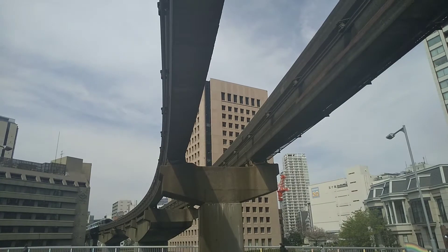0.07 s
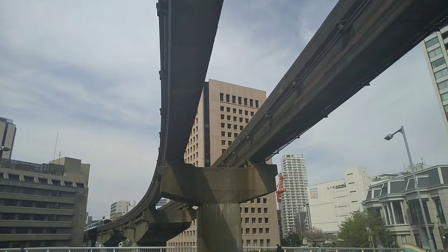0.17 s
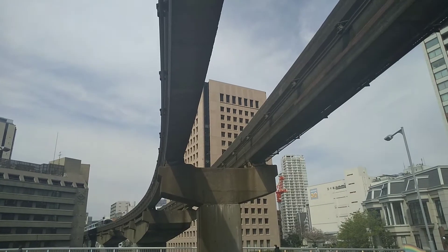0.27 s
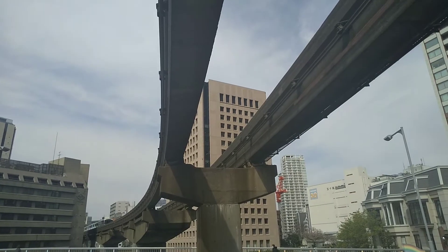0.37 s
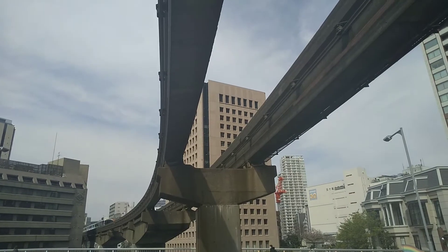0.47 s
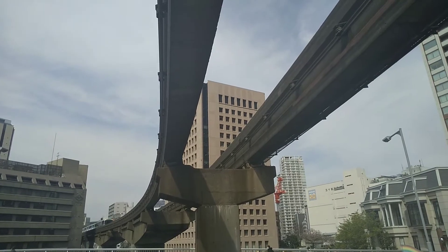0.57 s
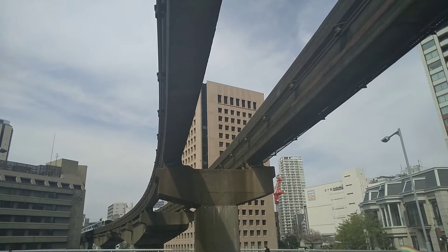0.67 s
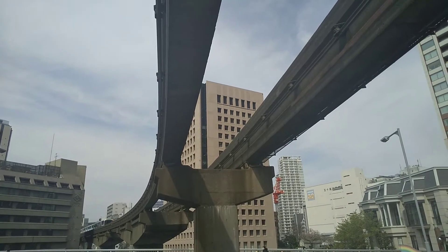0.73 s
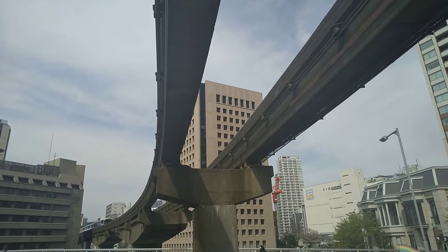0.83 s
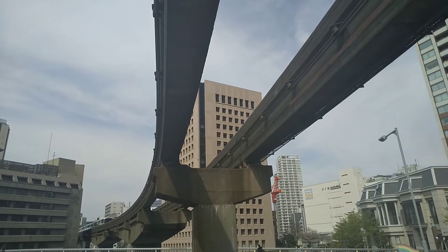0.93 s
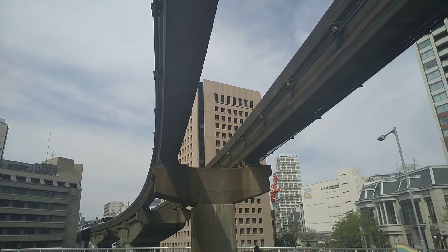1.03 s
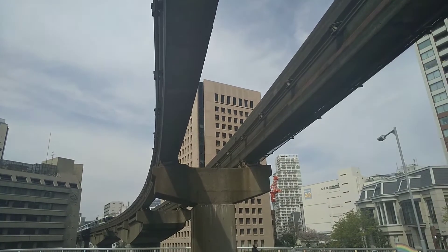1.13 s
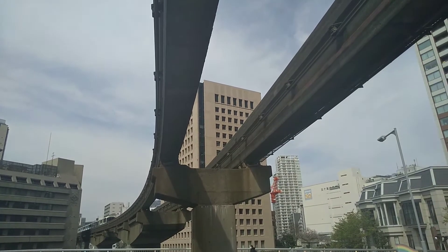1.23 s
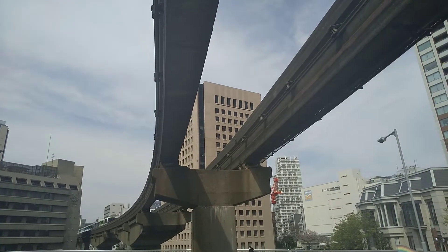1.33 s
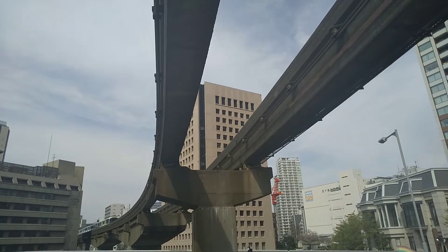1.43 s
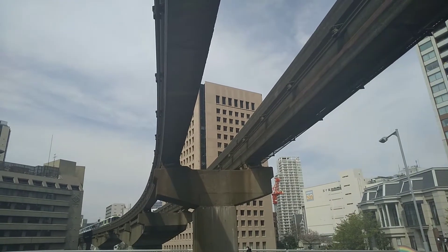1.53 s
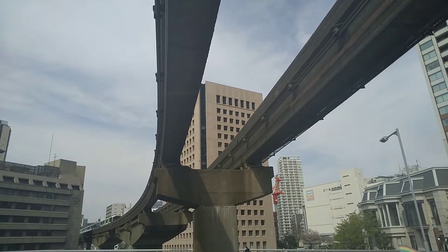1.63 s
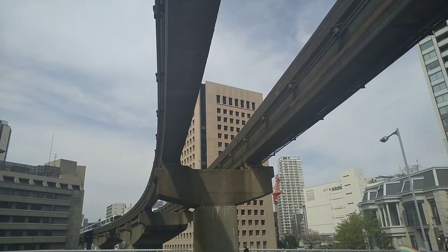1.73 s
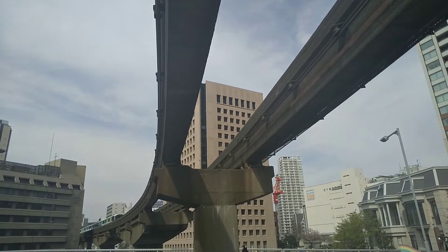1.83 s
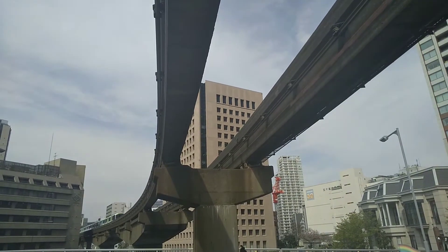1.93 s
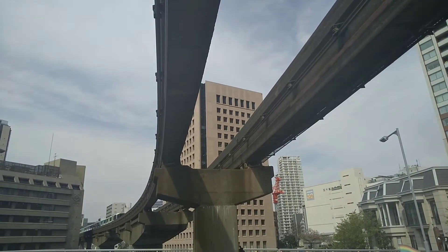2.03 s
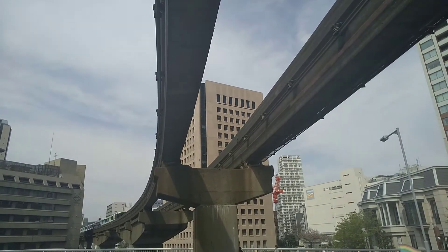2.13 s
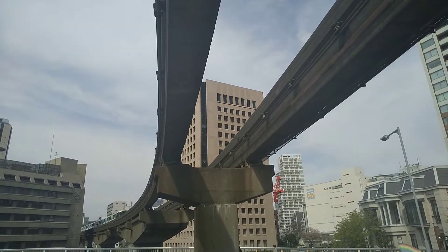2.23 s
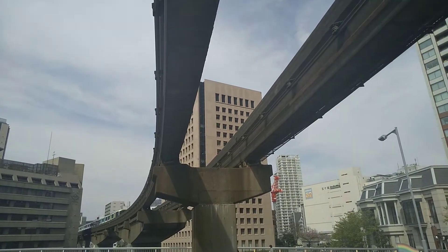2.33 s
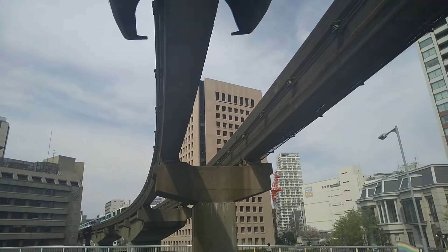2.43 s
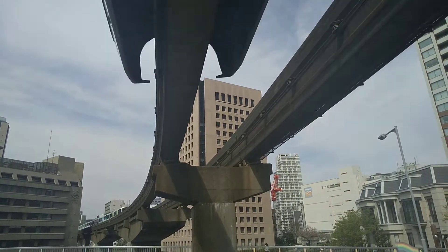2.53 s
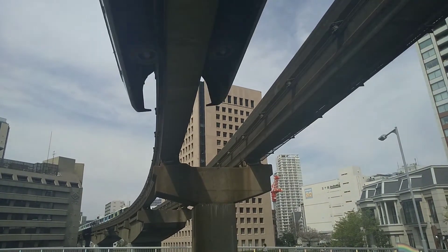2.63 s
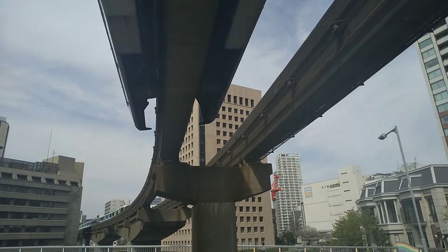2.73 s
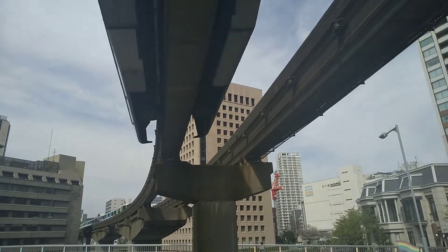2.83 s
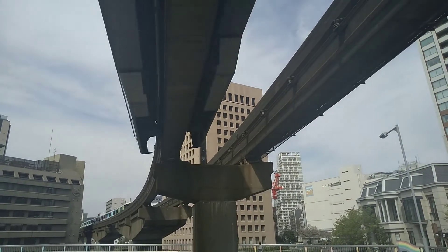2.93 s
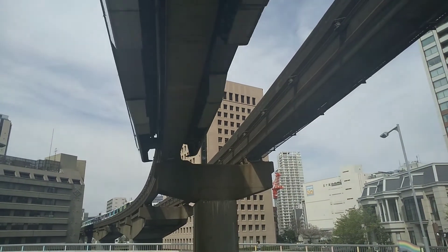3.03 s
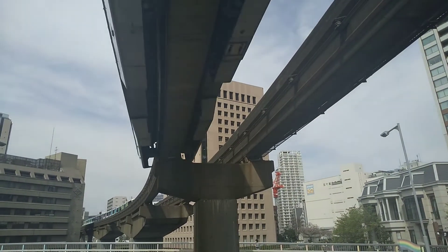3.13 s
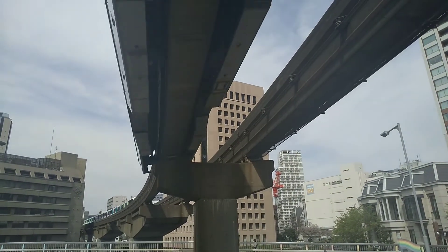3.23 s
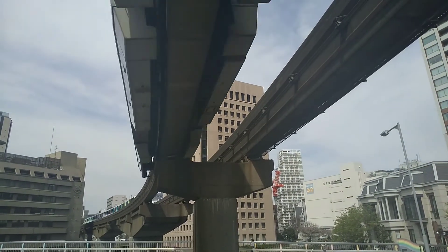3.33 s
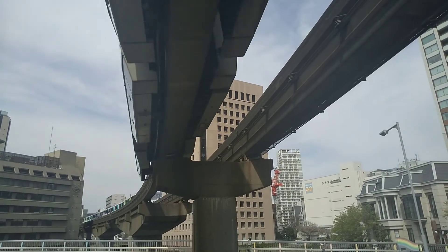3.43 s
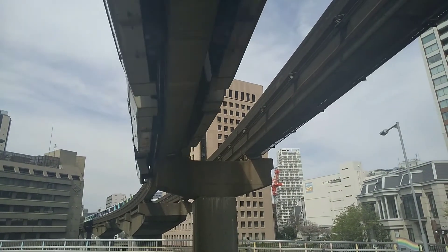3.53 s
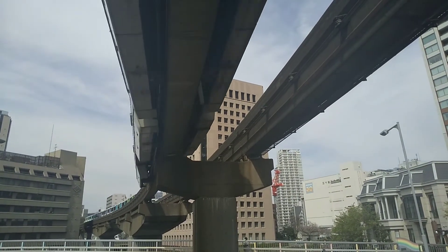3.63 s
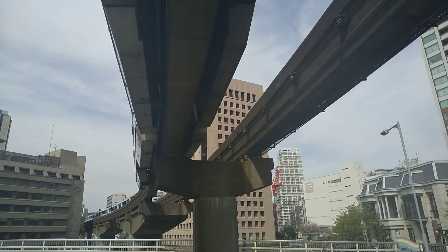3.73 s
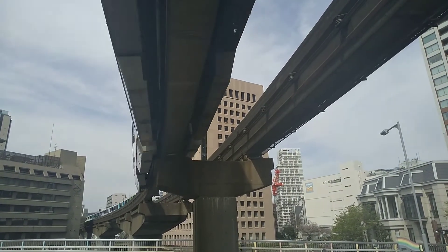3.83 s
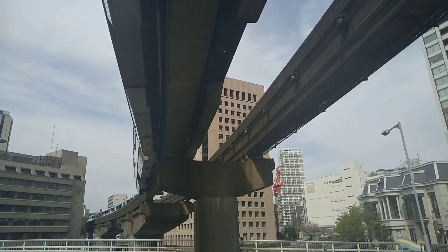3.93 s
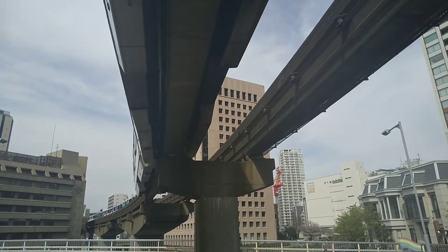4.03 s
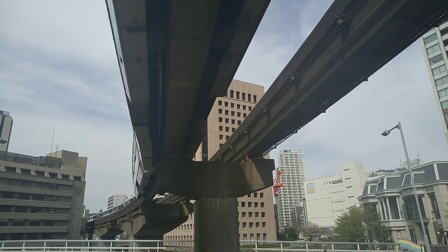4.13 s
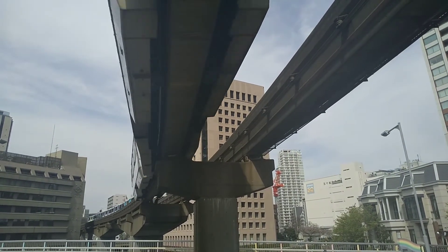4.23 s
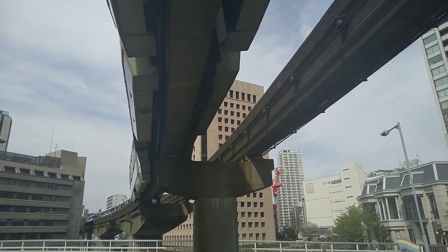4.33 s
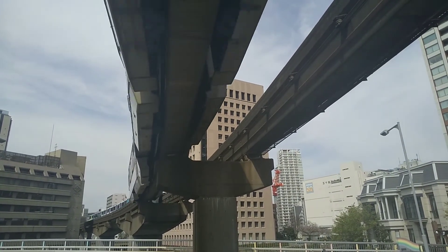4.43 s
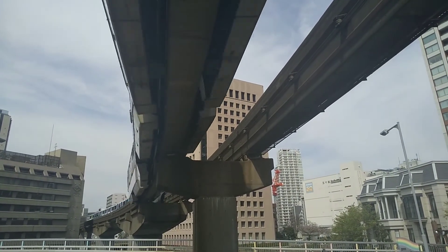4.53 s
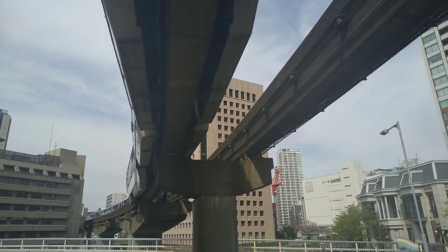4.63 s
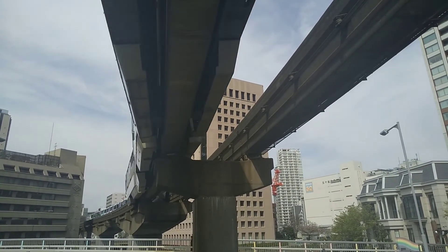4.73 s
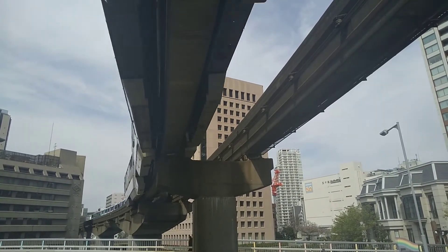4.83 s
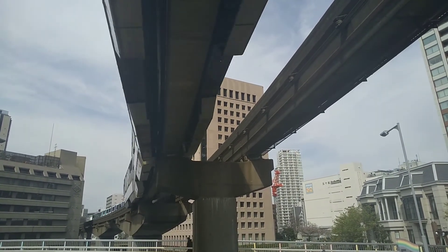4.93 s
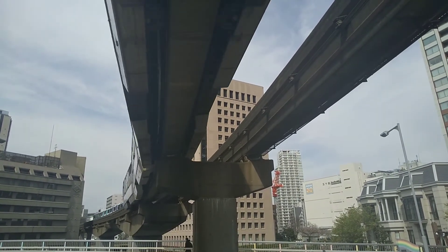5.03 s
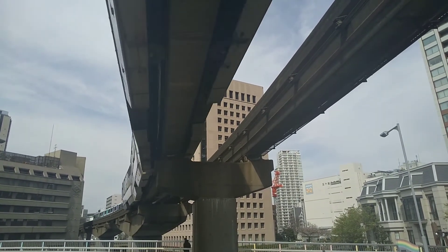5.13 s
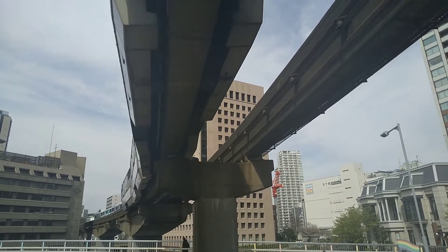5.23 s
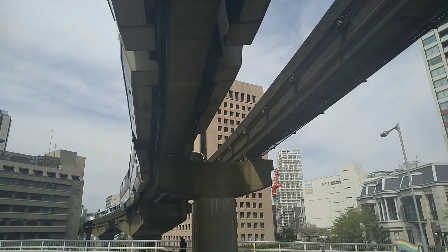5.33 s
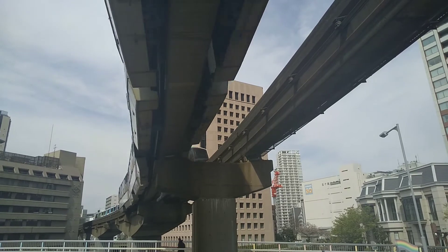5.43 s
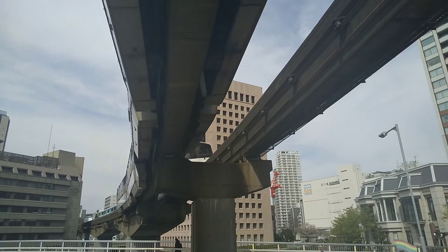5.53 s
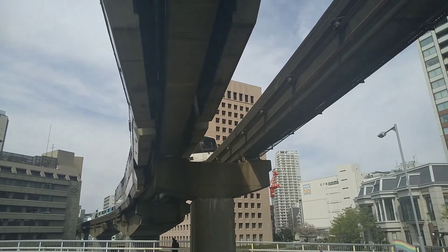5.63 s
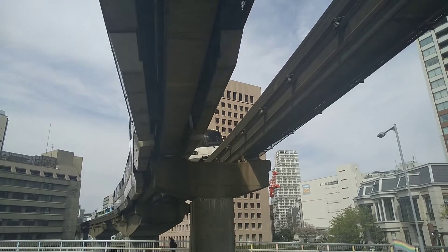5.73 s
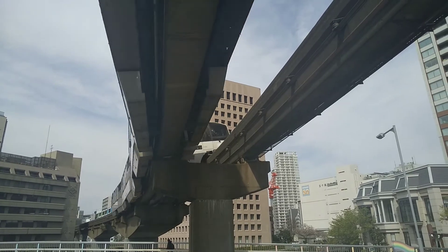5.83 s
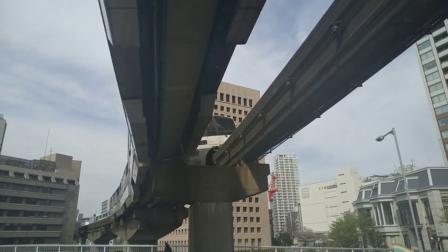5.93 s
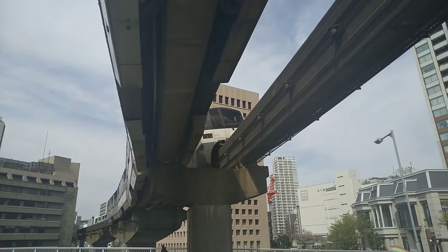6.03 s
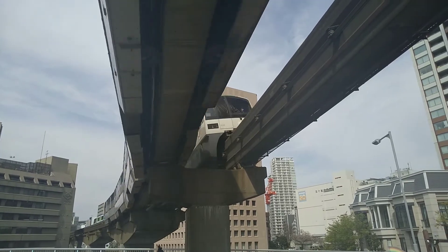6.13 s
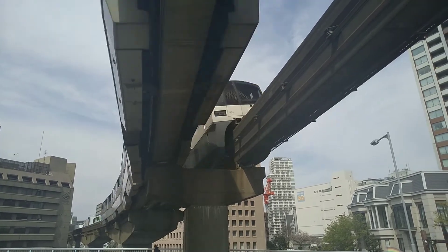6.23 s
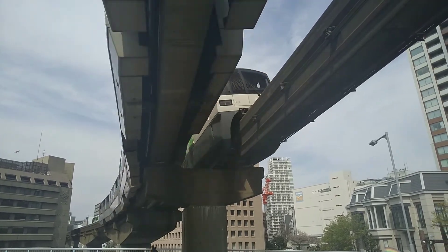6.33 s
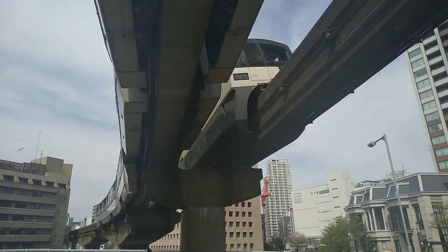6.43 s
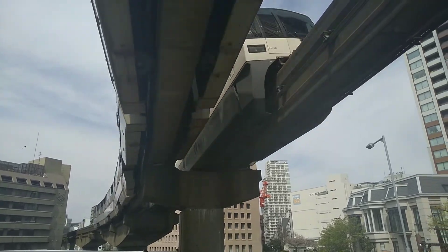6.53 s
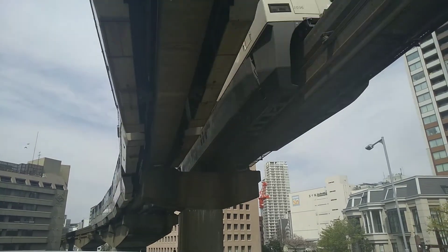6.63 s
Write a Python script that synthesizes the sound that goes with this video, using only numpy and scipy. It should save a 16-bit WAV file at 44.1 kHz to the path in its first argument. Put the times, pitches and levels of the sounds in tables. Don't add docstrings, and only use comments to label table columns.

```python
import sys
import numpy as np
from scipy import signal
from scipy.io import wavfile
from scipy.ndimage import uniform_filter1d

SR = 44100
rng = np.random.default_rng(int(sys.argv[2]) if len(sys.argv) > 2 else 0)


def store_wav(level_fs):
    pcm = np.round(np.clip(np.atleast_2d(level_fs), -1, 1) * 32767)
    wavfile.write(sys.argv[1], SR, pcm.T.astype(np.int16))


def decibels_to_gain(level_db):
    exponent = np.asarray(level_db, float) / 20
    return 10 ** exponent


N = 295029
TIME = np.arange(N) / SR
SLOW_TIME = TIME[::64]


def evened(x):
    return x / np.sqrt(np.mean(x ** 2) + 1e-20)


def follow(rows):
    s, level_db = np.transpose(rows)
    return np.interp(TIME, s, level_db)


def full(slow):
    return np.interp(TIME, SLOW_TIME, slow)


def bump(s, half_s):
    from_peak_s = SLOW_TIME - np.reshape(s, (-1, 1))
    return np.exp(-(from_peak_s / np.reshape(half_s, (-1, 1))) ** 2)


def wander(per_s):
    rates = np.geomspace(per_s / 8, per_s, num=24)[:, None]
    turns = rates * SLOW_TIME + rng.random(rates.shape)
    return full(evened(np.sin(2 * np.pi * turns).sum(0)))


def resonate(x, hz, width_hz):
    turn = np.exp(2j * np.pi * np.cumsum(hz * np.ones(len(x))) / SR)
    r = np.exp(-np.pi * width_hz / SR)
    once = signal.lfilter([1 - r], [1, -r], x / turn)
    return signal.lfilter([1 - r], [1, -r], once) * turn


def rush(spectrum, patchy_db, flicker_db, size=512):
    frames, hz = 4 * N // size + 5, np.fft.rfftfreq(size, 1 / SR)
    a, b, patches = rng.standard_normal((frames, len(hz), 3)).T
    patches = uniform_filter1d(patches, size=7, axis=0)
    patches = evened(uniform_filter1d(patches, size=16, axis=1))
    flicker = evened(uniform_filter1d(rng.standard_normal(frames), size=14))
    f, db = np.transpose(spectrum)
    colour_db = np.interp(np.log(hz + 1), np.log(f + 1), db, left=-120, right=-120)[:, None]
    z = (a + 1j * b) * decibels_to_gain(colour_db + patchy_db * patches + flicker_db * flicker)
    noise = signal.istft(z, nperseg=size, noverlap=3 * size // 4)[1]
    return evened(noise[:N])


# pitch_hz, level_db (per Hz)
CITY = [(76, -25), (130, 6.5), (161, -12), (248, 3.5), (421, -23), (599, -9), (939, -20), (1760, -15.5),
        (2600, -16), (2810, -26), (5260, -40), (9650, -52), (14000, -53)]


def city():
    return decibels_to_gain(-38) * rush(CITY, 0.58, 0.3, size=1024)


# time_s, level_db
GUIDE_LEVEL = [(0.04, -73), (1.35, -65), (2.03, -54), (2.49, -52.5), (2.82, -50.5), (3.6, -45), (4.48, -42),
               (4.93, -45), (5.24, -43), (5.85, -46.5), (6.69, -40.5)]


def guides():
    level_db = follow(GUIDE_LEVEL) + wander(13.0)
    whirr = resonate(rng.standard_normal(N), 4196, 1350).real
    return decibels_to_gain(level_db + 1.5) * evened(whirr)


# pitch_hz, level_db (per Hz)
SCRAPE = [(1710, -55), (2900, -4.5), (3290, 6.5), (4340, -2.5), (5230, 0), (5970, 2), (7630, -5.5),
          (8000, -10), (10400, -44), (17600, -120)]
HISS = [(4590, -25), (7800, -1.5), (9190, 5), (11500, -1.5), (15000, -30), (22000, -120)]
FIZZ = [(6590, -26), (11200, -2), (12700, 5), (13700, 2), (14200, 3), (14500, 4)]
# time_s, level_db
SHOE_NEARNESS = [(0.04, -26), (1.31, -20), (1.94, -11), (2.16, -8.5), (2.43, -5.5), (2.6, 2.3), (3.0, 0.5),
                 (3.5, 0.5), (3.65, 0.5), (4.3, 1), (4.56, -1), (5.1, -2.2), (5.4, 1.7), (5.7, -2.5),
                 (5.94, 1), (6.69, 1.2)]
# peak_s, hiss_lift_db, fizz_lift_db, half_length_s
FLARES = [(1.983, 9, 4, .01), (2.39, 1, 7, .06), (2.503, 5.5, 5, 0.069), (2.8, -4, 3, .12),
          (3.077, 2, 6.5, .04), (3.326, 3, 3, .06), (3.487, 2.5, 0, .04), (3.63, -1.5, -7, .05),
          (3.907, 3.5, 3.5, .05), (4.11, 3, 10, 0.02), (4.226, 2.5, 5, .03), (4.35, .8, 2, .04),
          (4.54, -2, 4, .02), (4.635, 4.5, .3, .03), (4.8, 1.5, 4, 0.11), (4.994, 2.5, 6, 0.074),
          (5.35, 2, -1, 0.036), (6.05, -0.5, 3, .05), (6.378, -0.5, 8, 0.19), (6.52, 2, 3, .04)]
# start_s, length_s, pitch_hz, level_db
SQUEAKS = [
    (2.43, .06, 9800, -58),
    (2.462, 0.09, 10850, -45),
    (2.85, 0.067, 12400, -54),
    (2.87, .04, 9150, -55),
    (6.32, 0.078, 11000, -54.5),
    (6.488, .04, 11100, -49),
    (6.53, .05, 11400, -59),
    (6.58, .04, 10000, -60),
]


def shoes():
    near_db = follow(SHOE_NEARNESS)
    peak_s, hiss_lift, fizz_lift, half_s = np.transpose(FLARES)
    flare = bump(peak_s, half_s)
    hiss_flare_db, fizz_flare_db = full(hiss_lift @ flare), full(fizz_lift @ flare)
    scrape_db = -47.5 + 0.89 * near_db + 0.86 * hiss_flare_db + 0.76 * wander(6.5)
    hiss_db = -51.5 + 0.99 * near_db + hiss_flare_db
    fizz_db = -56.5 + near_db + fizz_flare_db

    grains = rng.random(N) < 60 / SR
    grit = decibels_to_gain(4.0 * np.minimum(rng.exponential(1, N), 4)) * grains
    grain_decay = np.exp(-np.arange(400) / 120.0)
    gritty = 1 + 0.24 * signal.oaconvolve(grit, grain_decay)[:N]
    out = decibels_to_gain(scrape_db) * evened(gritty * rush(SCRAPE, 1.3, 1.0))
    out += decibels_to_gain(hiss_db) * evened(gritty * rush(HISS, 1.3, 0.35))
    out += decibels_to_gain(fizz_db) * evened(gritty * rush(FIZZ, 1.5, 0.35))

    noise = rng.standard_normal(N)
    for s, length, hz, db in SQUEAKS:
        span = slice(round(s * SR), round((s + length) * SR))
        squeak = evened(resonate(noise[span], hz, 170).real)
        out[span] += decibels_to_gain(db) * squeak * np.hanning(len(squeak))
    return out


# start_s, peak_db, plate_pitch_hz, length_s
CLACKS = [(0.878, -27, 1390, 0.062), (1.9573, -8.5, 1425, 0.028), (2.037, -16, 1324, 0.031),
          (2.107, -8, 1170, 0.015), (2.5167, -12, 1288, 0.04), (2.712, -13.5, 1210, 0.015),
          (2.8623, -16, 1510, 0.03), (3.226, -14.5, 1278, 0.035), (3.295, -15, 1280, 0.032),
          (3.356, -20, 1220, 0.0086), (3.431, -12, 1317, 0.033), (3.593, -12.5, 1310, 0.01),
          (3.8015, -5.5, 1250, 0.014), (3.8714, -15.5, 1440, 0.031), (4.082, -15, 1280, 0.024),
          (4.155, -10, 1210, 0.03), (4.239, -8.5, 1520, 0.024), (4.316, -20, 1490, 0.019),
          (4.3754, -11.5, 1288, 0.04), (4.533, -13.5, 1280, 0.014), (4.684, -14, 1234, 0.013),
          (4.749, -11.5, 1253, 0.038), (5.051, -11, 1260, 0.011), (5.2106, -12, 1433, 0.028),
          (5.6736, -15.5, 1180, 0.023), (5.751, -10, 1290, 0.026), (6.051, -15.5, 1490, 0.034),
          (6.133, -11.5, 1403, 0.015), (6.225, -12.5, 1440, 0.034), (6.485, -13, 1498, 0.032)]


def joints():
    out = np.zeros(N)
    t = np.arange(SR // 8) / SR
    blows = 1.01 + np.sin(np.pi * 111 * t) ** 2
    attack = np.tanh(t / 0.0043)
    tail = 0.27 * np.exp(-t / 0.16)
    noise = rng.standard_normal((len(CLACKS), len(t)))
    for (s, db, hz, length), rattle in zip(CLACKS, noise):
        ring = evened(sum(np.sin(2 * np.pi * hz * k * t) for k in (0.86, 0.97, 1.07, 1.2)))
        jangle = evened(resonate(rattle, hz, 480).real)
        plate = 0.39 * ring + 0.69 * jangle
        thud = decibels_to_gain(-6) * evened(resonate(rattle, 556, 810).real)
        shape = attack * (blows * np.exp(-(t / length) ** 2) + tail)
        part = out[round((s - 0.003) * SR):][:len(t)]
        part += (decibels_to_gain(db - 8) * shape * (plate + thud))[:len(part)]
    dull = signal.butter(4, 2500, fs=SR, output="sos")
    return signal.sosfilt(dull, out)


# pitch_hz, level_db (per Hz)
ROAR = [(220, -35.5), (380, 3), (450, -6), (597, -1), (662, 1), (822, -4), (1460, -7), (2490, -17.5),
        (2930, -26), (3600, -31.5), (4680, -59), (7920, -120)]
DRUM = [(82, -20), (140, 2.5), (172, -0.5), (226, 4), (291, -2), (329, -4), (387, -12), (426, -22.5),
        (480, -14.5), (620, -45), (1060, -120)]
RUMBLE = [(11, -44), (18, -34), (54, 11), (72, 10.5), (94, -32), (160, -120)]
# time_s, level_db (0 with the train overhead)
NEARNESS = [(0.0, -12), (0.15, -13.5), (0.86, -10.5), (1.3, -9), (1.84, -6.5), (1.97, -2), (2.5, -0.3),
            (3.0, 0), (3.6, -0.3), (4.6, -1.1), (5.0, 0), (5.7, -1), (6.69, 0.1)]
# time_s, roar_lift_db, drum_lift_db
BOGIES = [(1.36, -0.6, 2), (2.01, .3, 1), (2.35, -0.6, 2), (2.72, -0.6, -3.5), (3.2, 1.2, 2.5),
          (3.36, 2, 4.5), (3.87, 4.5, 4.5), (4.04, -1.5, -1), (4.2, 3.5, 7), (4.45, 2.5, 2), (4.73, 2.2, 1),
          (4.9, -0.1, 2.5), (5.09, 1, 2), (5.46, 2.5, 0.5), (5.78, 0.5, 1.5), (6.07, 0.5, 0),
          (6.19, 1.3, 4), (6.35, -1.5, 0), (6.46, 2.5, 0.2), (6.63, 0.8, 3)]
# time_s, lift_db; the last ones, from 6.5 s, come as a second train draws near
THUMPS = [(.05, 0), (2.0, -1), (3.0, 3), (3.72, 5), (4.13, 5), (4.64, 6), (5.2, 13.5), (5.46, 2), (5.75, 2),
          (6.1, 6), (6.5, 10), (6.67, 8)]


def tyres():
    near_db = follow(NEARNESS)
    bogie_s, roar_lift, drum_lift = np.transpose(BOGIES)
    overhead = bump(bogie_s, 0.13)
    thump_s, thump_lift = np.transpose(THUMPS)
    thump_db = full(thump_lift @ bump(thump_s, 0.065))
    roar_db = -19 + near_db + full(roar_lift @ overhead)
    drum_db = -20.5 + near_db + full(drum_lift @ overhead)
    rumble_db = -29.5 + 0.53 * near_db + thump_db + 1.2 * wander(5.4)
    roar = decibels_to_gain(roar_db) * rush(ROAR, 0.78, 0.22)
    drum = decibels_to_gain(drum_db) * rush(DRUM, 1.0, 0.99, size=4096)
    rumble = decibels_to_gain(rumble_db) * rush(RUMBLE, 0.3, 0.27, size=8192)
    return roar + drum + rumble


def swells(rows):
    s, db, hz, half_s = np.transpose(rows)
    each = decibels_to_gain(db)[:, None] * bump(s, half_s) + 1e-9
    total = each.sum(0)
    return full(total), full(hz @ each / total)


# peak_s, level_db, pitch_hz, half_length_s
SWELLS_LOW = [(0.03, -23.5, 85, 0.11), (0.48, -27.5, 81, 0.15), (1.0, -28.5, 90, 0.17),
              (1.49, -22.5, 87.6, 0.056), (1.72, -35.5, 87, 0.16), (2.005, -13.5, 92, 0.034),
              (2.09, -12, 90.3, 0.058), (2.24, -18.5, 87, 0.061), (2.62, -17, 90, 0.16),
              (2.89, -18.5, 85.5, 0.055), (3.08, -10.5, 85.2, 0.065), (3.66, -12.5, 90.2, 0.08),
              (3.84, -18.5, 91, 0.029), (3.99, -12.5, 89.1, 0.1), (4.28, -14.5, 85.6, 0.019),
              (4.43, -16, 96, 0.044), (4.66, -15, 94.5, 0.12), (4.98, -16, 84.1, 0.11),
              (5.23, -16, 79.7, 0.023), (5.4, -12, 84.3, 0.059), (5.6, -11, 93, .11),
              (5.94, -13.5, 87.3, 0.11), (6.13, -16, 85.3, .04), (6.25, -21, 78, .05),
              (6.5, -16, 87.2, 0.15), (6.68, -21.5, 91, 0.12)]
# peak_s, level_db, pitch_hz, half_length_s
SWELLS_HIGH = [(0.18, -34.5, 106, .1), (0.86, -30.5, 105.7, 0.068), (1.04, -24, 100.7, 0.038),
               (1.28, -34, 110, 0.061), (1.48, -32.5, 109, 0.064), (1.86, -22.5, 105.7, 0.023),
               (2.2, -15.5, 103.3, 0.1), (2.45, -17.5, 107.2, 0.1), (2.8, -15.5, 101.2, 0.085),
               (3.13, -17, 101, .12), (3.41, -21.5, 100, 0.066), (3.65, -20.5, 105.5, 0.11),
               (3.92, -11, 108.8, 0.074), (4.17, -18.5, 102.6, .06), (4.45, -10, 99, 0.054),
               (4.62, -22.5, 103.6, 0.23), (4.8, -17.5, 111.2, 0.092), (5.0, -18.5, 110.7, 0.11),
               (5.17, -19.5, 104.4, 0.042), (5.53, -14, 108.2, 0.18), (5.95, -17.5, 108, 0.16),
               (6.33, -19.5, 110.2, .07), (6.55, -15, 110.9, 0.078), (6.69, -14, 112, 0.033)]
# rest_db between swells, share of nearness followed, width_hz
MODES = [(-25.5, 1.6, 9.2), (-28, 1.36, 9), (-23.5, 1.3, 22)]


def beam():
    out, near_db = np.zeros(N), follow(NEARNESS)
    top_mode = (0, 121.9 + 5.3 * wander(3.0))
    loads = [swells(SWELLS_LOW), swells(SWELLS_HIGH), top_mode]
    for (swell, hz), (rest_db, share, width_hz) in zip(loads, MODES):
        ring = resonate(rng.standard_normal(N), hz, width_hz) + 1e-9
        steadied = ring / abs(ring) ** 0.68
        out += (swell + decibels_to_gain(rest_db + share * near_db)) * evened(steadied.real)
    heavy = signal.butter(3, [58, 150], "bandpass", fs=SR, output="sos")
    return signal.sosfiltfilt(heavy, out)


def scene():
    return (city() + guides() + shoes() + joints() + tyres() + beam())[None]


def top_cut(x):
    return signal.sosfilt(signal.butter(12, 14430, fs=SR, output="sos"), x)


def record(dry):
    heard = dry[0] - 2 * 0.32 * resonate(dry[0], 7650, 1200).real
    size_db = 20 * np.log10(abs(heard) + 1e-9)
    fall_db = 74.0 * TIME
    held_db = np.maximum.accumulate(size_db + fall_db) - fall_db
    over_db = np.maximum(held_db + 6.0, 0)
    over_db = uniform_filter1d(over_db, size=200)
    ducked = heard * decibels_to_gain(1.0 - 0.7 * over_db)
    edge = signal.firwin(2047, 14270, window=("kaiser", 9), fs=SR)
    return top_cut(signal.oaconvolve(ducked, edge, "same")[None])


dry = scene()
out = record(dry)
store_wav(out)
```